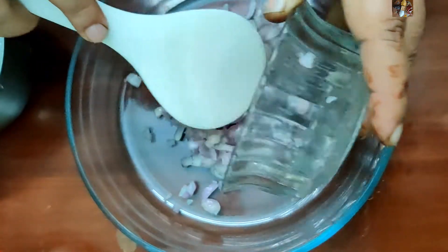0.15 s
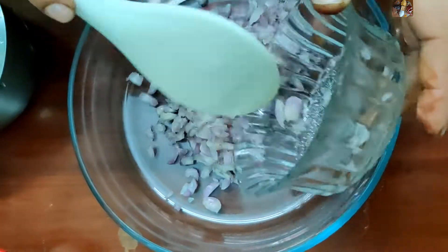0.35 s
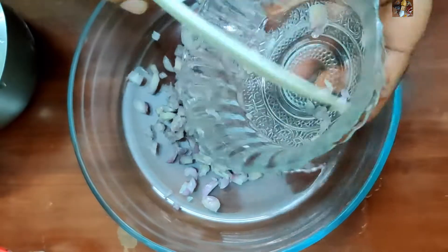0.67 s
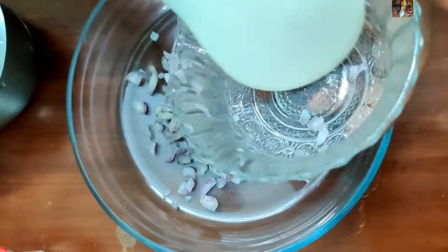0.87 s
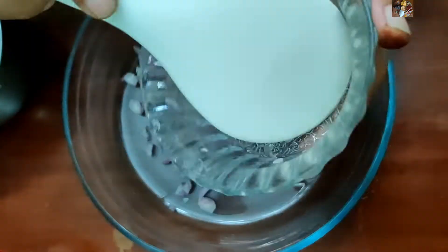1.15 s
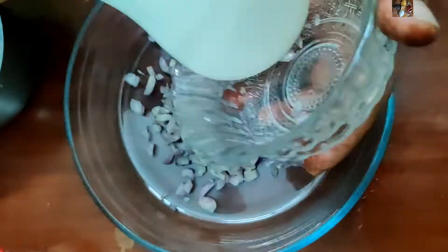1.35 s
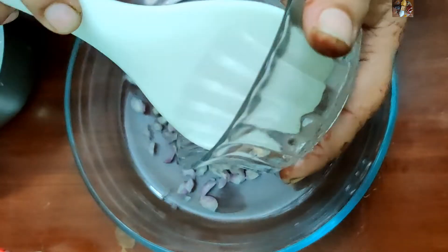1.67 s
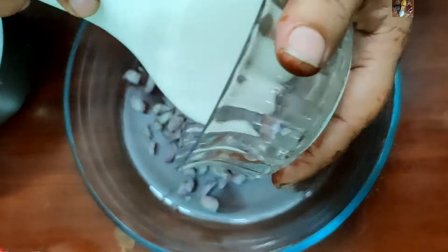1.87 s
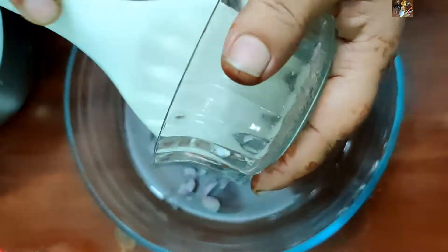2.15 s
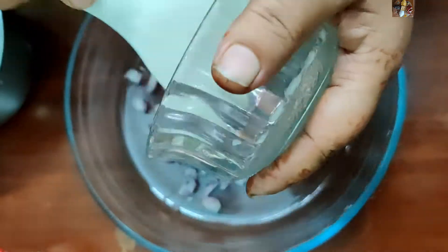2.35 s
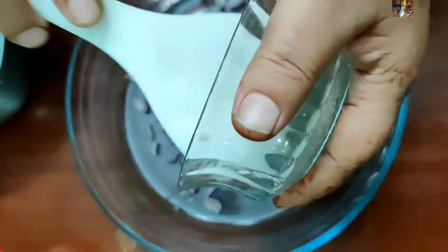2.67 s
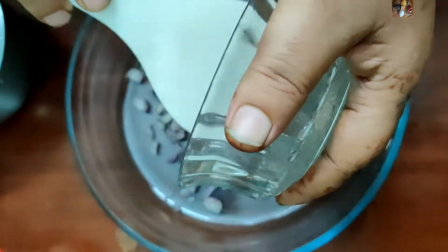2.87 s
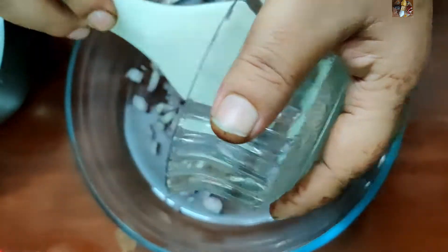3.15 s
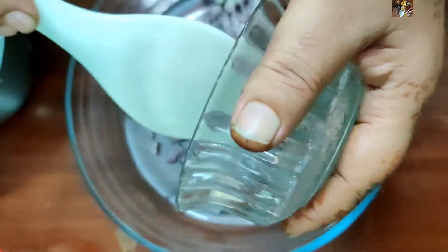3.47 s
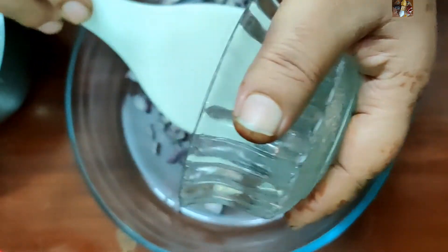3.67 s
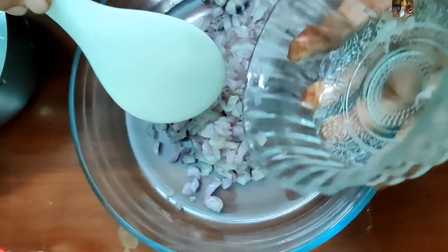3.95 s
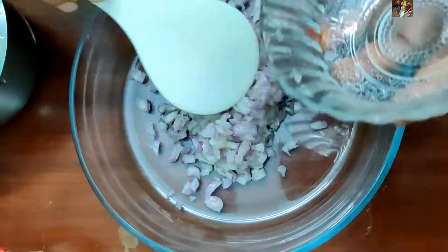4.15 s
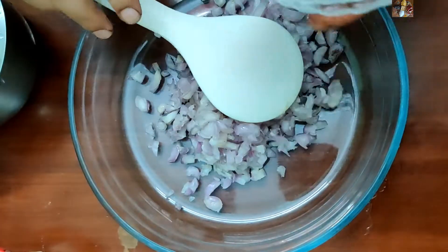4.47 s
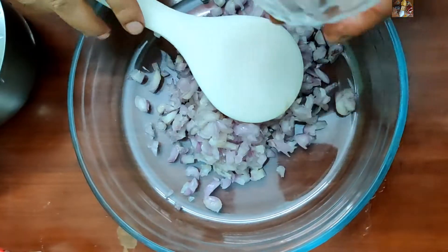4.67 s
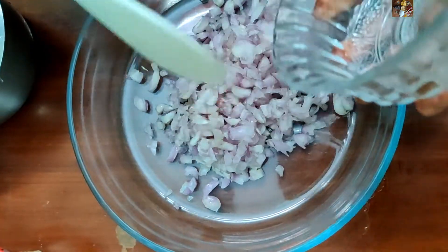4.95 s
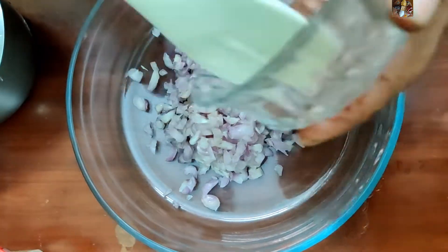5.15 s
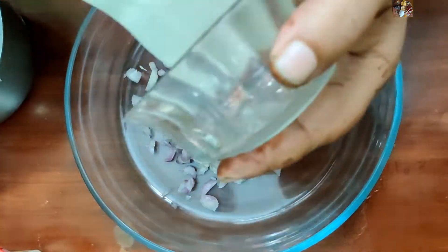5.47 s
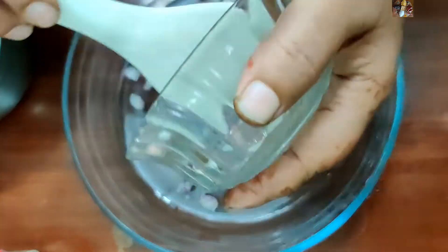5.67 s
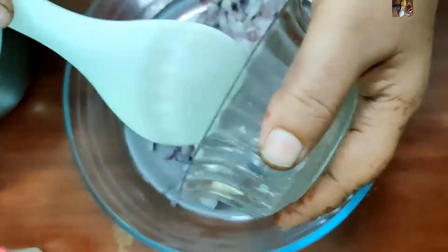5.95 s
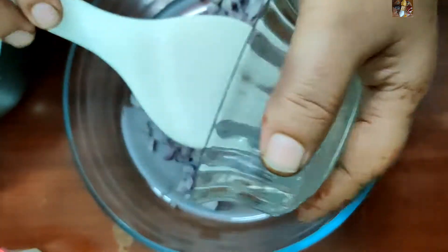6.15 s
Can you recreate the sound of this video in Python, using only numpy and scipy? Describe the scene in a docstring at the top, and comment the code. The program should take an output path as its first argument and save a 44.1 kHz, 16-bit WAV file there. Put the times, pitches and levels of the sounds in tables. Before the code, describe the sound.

Uneven bursts of plastic knocking on glass, some cushioned by moist onion, some bright and hard, with short gritty scrapes between. After a sparse start comes one very loud hollow clack, then busy tapping. A lull holds barely audible onion pats and a touch of the big bowl, which rebounds and rings with a slight waver. More firm taps follow. Close stereo phone pickup, lively kitchen reflections, low mains hum and quiet room air.

```python
"""A plastic spatula knocks chopped onion out of a small hand-held glass bowl into a big glass bowl, close to a phone.
Taps run throughout: dull knocks where onion cushions them, short clinks on bare glass; the blade scrapes between.
At 1.3 s it slaps down flat with a loud hollow clack; heavy blows also thump the table.
Near 4 s onion bits patter down, then at 4.5 s the big bowl is touched, rebounds and rings freely; taps resume at 5.3 s.
Impacts excite decaying modes and filtered noise; a hard-walled kitchen echoes over mains hum and room air."""
import sys
import numpy as np
from scipy import signal
from scipy.fft import rfft, irfft
from scipy.io import wavfile
from scipy.ndimage import uniform_filter1d, minimum_filter1d

SR = 44100
rng = np.random.default_rng(int(sys.argv[2]) if len(sys.argv) > 2 else 0)


def transcribe(u):
    """Save the signal u as a 16-bit wav file named by the first command-line argument.

    u: samples, shape (n,) or (channels, n), limited to [-1, 1]; the rate is SR.
    q: integer samples, one column per channel.
    """
    v = np.clip(np.atleast_2d(u).T, -1, 1)
    q = np.round(v * 32767).astype(np.int16)
    wavfile.write(sys.argv[1], SR, q)


N = 278252
TEN_MS = SR // 100  # samples

# modes of the hand-held bowl, 1 low ring, 4 high ring, rest top ring: (frequency [Hz], level [dB], t60 [s])
SMALL_BOWL_MODES = [(1808.6, 19.5, 0.07), (4583, 19.5, 0.081), (4550, 10.5, 0.1), (4680, 6.5, 0.061),
                    (4860, 2, 0.0453), (7880, -3.5, 0.073), (7980, 0.5, 0.055), (11330, -11.5, 0.035),
                    (12200, -12, .035)]
LOW_MODES, HIGH_MODES, TOP_MODES = SMALL_BOWL_MODES[:1], SMALL_BOWL_MODES[1:5], SMALL_BOWL_MODES[5:]
# spectrum of a click on glass: (frequency [Hz], level [dB])
CLICK_SPECTRUM = [(100, -15.5), (500, -2.5), (1000, 3), (3100, 6.5), (4050, -1.5), (4850, 13),
                  (5900, -15.5), (7000, -11), (8200, -11), (10000, -26.5), (12500, -27.5), (16000, -42.5)]
# right microphone port against the left, for the room: (frequency [Hz], level [dB])
RIGHT_ROOM_SPECTRUM = [(100, 5), (1300, -1), (3000, -1.5), (4200, -23), (4700, -11), (5300, -1.5),
                       (6200, 6), (8000, 2), (15000, -2.5)]


def undb(db):
    """Amplitude ratio of a level in dB."""
    return 10 ** (np.asarray(db) / 20)


def along(points, hz):
    """Read (frequency [Hz], value) points on a log-frequency axis."""
    point_hz, value = np.transpose(points)
    return np.interp(np.log(hz + 1), np.log(point_hz), value)


def response(points, tilt_db_per_octave=0, size=2048):
    """Minimum-phase impulse response of a spectrum, tilted above 3 kHz."""
    hz = np.arange(size // 2 + 1) * SR / size
    db = along(points, hz) + tilt_db_per_octave * np.log2(np.maximum(hz / 3000, 1))
    # folding the cepstrum onto positive time makes the response causal
    cepstrum = irfft(np.log(undb(db)))
    cepstrum[1:size // 2] *= 2
    cepstrum[size // 2 + 1:] = 0
    return irfft(np.exp(rfft(cepstrum)))


def colour(x, points):
    """Filter by a spectrum."""
    return signal.fftconvolve(x, response(points))[:len(x)]


def blow(x, db):
    """Scale a transient to the energy of 10 ms at this level."""
    return x * undb(db) * np.sqrt(TEN_MS / np.sum(x ** 2))


def add(track, s, x):
    """Mix x into the track at time s."""
    i = max(int(s * SR), 0)
    track[i:i + len(x)] += x[:max(len(track) - i, 0)]


def ring(modes, detune=0., scatter=0.):
    """Decaying modes; grip and point of contact shift their pitch and strength (as fractions)."""
    t = np.arange(int(SR * np.max(modes, axis=0)[2])) / SR
    out = 0
    for hz, db, t60_s in modes:
        pitch_shift, size_shift = rng.uniform(-1, 1, 2)
        decay = np.exp(-np.log(1000) * t / t60_s)
        wave = np.sin(2 * np.pi * hz * (1 + detune * pitch_shift) * t) * decay
        out = out + blow(wave, db) * (1 + scatter * size_shift)
    return out


def contact(shape, chatter, t60_s, rise_s=0.00022):
    """One impact plus fast-dying chatter of the touching surfaces (amplitude ratio), both through shape."""
    t = np.arange(SR // 20) / SR
    swell = (1 - np.exp(-t / rise_s)) * np.exp(-np.log(1000) * t / t60_s)
    push = blow(rng.standard_normal(len(t)) * swell, 0) * chatter / np.sqrt(TEN_MS)
    push[0] += 1
    return signal.fftconvolve(push, shape)


def small_bowl():
    """Taps knock on the hollow under the blade, click and clack on the glass and ring the damped bowl.
    Hard contact shifts the balance from knock to click and top modes; the rim favours the low ring, the wall the high.
    The grip of the hand sets how strongly the glass rings."""
    # taps: (time [s], force [dB], hardness [0 onion-cushioned..1 bare glass], place [0 low on wall..1 rim],
    # glass ring [dB], knock pitch [Hz])
    taps = [(0.0185, -41, 0.23, 1, -4, 1290), (0.6713, -26, 0.044, 0.37, 9.5, 1102),
            (0.6763, -27, 0.74, 0.24, -4, 940), (1.2427, -50, 0, 0.72, 13.5, 1190),
            (1.3985, -25.5, 0.2, 1, -4, 1330), (1.4554, -20, 0.76, 0.31, -0.5, 1320),
            (1.6989, -29, 0.56, 0.33, 8.5, 1180), (1.784, -24, 0.38, 0.87, -11, 1097),
            (2.188, -33, 0.7, 0.55, 1.5, 1196), (2.24, -30, 0.75, 0.17, -12, 2340),
            (2.464, -44.5, 0, 0.29, -10, 1150), (2.481, -30.5, 0.14, 0.14, -7.5, 1093),
            (2.62, -31.5, 0.62, 0.17, -5.5, 1120), (2.652, -35, 0.82, 0.38, 0, 1390),
            (2.667, -43, 0.74, .3, -6, 1500), (2.6965, -34.5, 0.6, 0.33, 0, 2220),
            (2.936, -39.5, 0.31, 0.38, -0.5, 1186), (3.133, -37, 0.55, 0.5, 3.5, 1234),
            (3.1665, -34.5, 0.64, 0.96, -2.5, 1270), (3.2377, -33.5, 0.18, 0.33, -7, 1185),
            (3.299, -20.5, 0.46, 0.42, 0.5, 1126), (3.6845, -28.5, 0.45, 0.5, 10.5, 1235),
            (3.7997, -28, 0.28, 0.58, 2, 1183), (3.825, -38, 0.47, 0.78, -1, 1150),
            (3.85, -33, 0.48, 0.73, 5, 1210), (5.275, -36.5, 0.81, 0.6, 3, 1190),
            (5.312, -29.5, 0.89, 0.98, -1, 1210), (5.5251, -25.5, 0.3, 0.46, 6, 1188),
            (5.7236, -37.5, 0.76, 0.68, -5, 2500), (5.8305, -18, 0.38, 0.4, -2, 1224),
            (5.838, -28, 0.13, 0.3, 2.5, 1240), (5.937, -35.5, 0.29, 0.56, -3, 1200),
            (6.1776, -26.5, 0.43, 0.73, 6, 1224), (6.2997, -29, 0.21, 0.82, 3.5, 1210)]
    # quickly damped wall modes: (frequency [Hz], level [dB], t60 [s])
    wall_modes = [(1420, 3, 0.0032), (2300, -5, 0.011), (3380, 2, 0.024)]
    # knock of the hollow between blade and wall: (multiple of knock pitch [1], level [dB])
    knock_spectrum = [(.1, -32.5), (.35, -20.5), (.62, -7.5), (1, 12.5), (1.24, -0.5), (1.6, -23),
                      (3.4, -26.5), (13, -69.5)]
    # how each part follows the contact: (level re force [dB], added at full hardness [dB], added at rim [dB])
    knock_law = (0.38, -25.5, 0)
    click_law = (-19.5, 18.6, 0)
    wall_law = (-26, 13, 0)
    low_ring_law = (-29, 12.7, 15.7)
    high_ring_law = (-6.5, 22.55, -27)
    top_ring_law = (-49, 37.1, 7.9)
    # a narrower hollow snaps higher and louder
    usual_hollow_hz, snap_db_per_octave = 1170, 8.5
    # harder contact is brighter
    soft_tilt_db_per_octave, hard_tilt_db_per_octave = -8, 11.5

    out = np.zeros(N)
    for s, force_db, hardness, place, glass_db, knock_hz in taps:
        hollow = response([(multiple * knock_hz, db) for multiple, db in knock_spectrum])
        knock = contact(hollow, chatter=0.19, t60_s=0.034)
        snap_db = snap_db_per_octave * np.log2(knock_hz / usual_hollow_hz)

        tilt = soft_tilt_db_per_octave + hard_tilt_db_per_octave * hardness
        click = contact(response(CLICK_SPECTRUM, tilt), chatter=14, t60_s=.032, rise_s=.0008)
        clack = ring(wall_modes, detune=.1, scatter=.6)

        low = ring(LOW_MODES, detune=.009)
        high = contact(ring(HIGH_MODES, detune=.007, scatter=.6), chatter=1.3, t60_s=0.025)
        top = ring(TOP_MODES, detune=.012, scatter=.6)

        parts = (
            (knock, knock_law, snap_db),
            (click, click_law, 0),
            (clack, wall_law, 0),
            (low, low_ring_law, glass_db),
            (high, high_ring_law, glass_db),
            (top, top_ring_law, 0),
        )
        for sound, (base_db, hard_db, rim_db), own_db in parts:
            level_db = force_db + base_db + hard_db * hardness + rim_db * place + own_db
            add(out, s, blow(sound, level_db))
    return out


def slap():
    """The blade lands flat in the bowl: one loud, hollow clack that leaves each side with its own rattle."""
    # hollow clack: (frequency [Hz], level [dB])
    slap_spectrum = [(200, -30), (680, -16), (1000, 4), (1300, 5.5), (1600, -7), (1830, 1.5), (2080, -6),
                     (2350, 2), (2900, -16), (4100, -18.5), (4750, -5.5), (5600, -30), (15000, -53)]
    slap_s, slap_db = 1.2986, -8.5
    out = np.zeros((2, N))
    for side in out:
        clack = contact(response(slap_spectrum), chatter=.45, t60_s=.015)
        add(side, slap_s, blow(clack, slap_db))
    return out


def big_bowl():
    """Glass meets glass: a click and a long ring whose close pair of modes beats, then a light rebound.
    Each mode radiates differently to left and right."""
    # free modes: (frequency [Hz], level [dB], t60 [s], right re left [dB])
    bowl_modes = [(747, -16, 0.45, -20.5), (1703, 1.5, 0.32, -2.5), (1681, -12.5, .3, -26),
                  (2720, -6, 0.41, 2), (3849, -12.5, 0.48, 9), (5130, -18, 0.37, 2), (6700, -35, 0.3, 8.5),
                  (8150, -31, 0.22, -21)]
    # touch and rebound: (time [s], ring level [dB], click level [dB])
    touches = [(4.5055, -27.5, -35), (4.527, -39, -37)]
    out = np.zeros((2, N))
    left = ring([(hz, db, t60_s) for hz, db, t60_s, _ in bowl_modes])
    right = ring([(hz, db + right_db, t60_s) for hz, db, t60_s, right_db in bowl_modes])
    for s, ring_db, click_db in touches:
        click = contact(response(CLICK_SPECTRUM, tilt_db_per_octave=-5), chatter=4.8, t60_s=0.032)
        click = blow(click, click_db)
        for side, tone in zip(out, (left, right)):
            add(side, s, tone * undb(ring_db))
            add(side, s, click)
    return out


def scraping():
    """The blade slips in uneven grains that rasp and make the glass shimmer; bare glass rasps brighter than onion."""
    # strokes: (start [s], end [s], rasp level [dB], glass ring level [dB], treble tilt [dB/octave])
    strokes = [(0.799, 1.069, -65, -66.5, 8), (0.918, 0.964, -58.5, -51, 7.5),
               (1.338, 1.452, -41.5, -61, -0.5), (1.858, 1.983, -55.5, -88, 0),
               (2.858, 2.954, -58.5, -66.5, 7.5), (3.72, 3.88, -54.5, -57, -10),
               (5.384, 5.438, -50, -60, 7.5), (5.866, 5.97, -52.5, -58, 4)]
    # rasp before tilt: (frequency [Hz], level [dB])
    rasp_spectrum = [(100, -20), (1000, 5.5), (1500, 5), (2350, 1.5), (4700, -12.5), (15000, -44)]
    slips_per_s, top_re_glass_db = 3000, -15
    # the stroke catches and lets go
    catches_per_s, catch_spread_db = 130, 5

    out = np.zeros(N)
    glass, top = ring(HIGH_MODES), ring(TOP_MODES)
    for start_s, end_s, rasp_db, glass_db, tilt in strokes:
        n = max(int((end_s - start_s) * SR), TEN_MS)
        slips = rng.random(n) < slips_per_s / SR
        grains = slips * rng.standard_normal(n) * undb(3 * rng.standard_normal(n))

        catches = rng.standard_normal(int(n / SR * catches_per_s) + 2)
        catch_position = np.arange(n) / SR * catches_per_s
        pressure_db = catch_spread_db * np.interp(catch_position, np.arange(len(catches)), catches)
        grains *= undb(pressure_db) * signal.windows.tukey(n, .5)

        bodies = (
            (response(rasp_spectrum, tilt), rasp_db),
            (glass, glass_db),
            (top, glass_db + top_re_glass_db),
        )
        for body, db in bodies:
            # level holds over the stroke's length, not 10 ms
            add(out, start_s, blow(signal.fftconvolve(grains, body), db) * np.sqrt(n / TEN_MS))
    return out


def table():
    """Heavy blows thump the wooden table: low-frequency impacts with brief chatter."""
    # blows that reach the table: (time [s], level [dB])
    thuds = [(1.456, -32.5), (1.6998, -39), (1.7826, -45.5), (3.297, -42)]
    # thump: (frequency [Hz], level [dB])
    thud_spectrum = [(40, -19.5), (130, -6.5), (230, 0), (350, 3.5), (480, -6.5), (700, -6.5), (1200, -26),
                     (5000, -52.5)]
    out = np.zeros(N)
    for s, db in thuds:
        add(out, s, blow(contact(response(thud_spectrum), chatter=0.92, t60_s=0.011), db))
    return out


def onion_bits():
    """Moist bits drop into the big bowl with a soft, dead pat: two very short modes with chatter."""
    # landings: (time [s], level [dB])
    landings = [(4.012, -60.5), (4.257, -60), (4.381, -60)]
    pat_modes = [(2920, -1.5, .015), (1650, -3.5, 0.007)]  # (frequency [Hz], level [dB], t60 [s])
    out = np.zeros(N)
    for s, db in landings:
        pat = contact(ring(pat_modes, detune=0.072), chatter=3.0, t60_s=0.054)
        add(out, s, blow(pat, db))
    return out


def echo_pattern(wet_db, build_s):
    """Bowl and table top answer at once; the hard walls follow with separate echoes that thicken into a wash."""
    # room decay: (frequency [Hz], t60 [s])
    room_t60 = [(150, 0.98), (1000, 0.6), (2500, 0.67), (5000, 0.54), (14000, 0.57)]
    # room colour: (frequency [Hz], level [dB])
    room_spectrum = [(100, -6), (500, 1), (1100, -1), (2600, -0.5), (4500, -1.5), (9000, -3.5),
                     (15000, 3.5)]
    near_db, near_decay_s, wall_delay_s = 9, 0.007, 0.023
    echo_spread_db = 9  # unevenness of the first echoes

    t = np.arange(SR) / SR
    spread_db = echo_spread_db * np.exp(-t / .15) * rng.standard_normal(SR)
    echoes = rng.standard_normal(SR) * undb(spread_db)
    echoes /= np.sqrt(uniform_filter1d(echoes ** 2, size=600))

    # each frequency decays at its own rate
    hz, frame_s, cells = signal.stft(echoes, SR, nperseg=256)
    cells = cells * np.exp(-np.log(1000) * frame_s / along(room_t60, hz)[:, None])

    near = undb(near_db) * (1 - np.exp(-t / build_s)) * np.exp(-t / near_decay_s)
    walls = np.clip(t / wall_delay_s, 0, 1) ** 2
    tail = signal.istft(cells, SR)[1][:SR] * (near + walls)
    return colour(undb(wet_db) * tail / np.sqrt(np.sum(tail ** 2)), room_spectrum)


def kitchen(x, wet_db, build_s):
    """The hands and the bowl keep moving, so each second has its own pattern of echoes."""
    out = np.zeros(N)
    for i in range(0, N, SR):
        add(out, i / SR, signal.fftconvolve(x[i:i + SR], echo_pattern(wet_db, build_s)))
    return out


def background(air_db=-64.0):
    """Wavering mains-hum sines and filtered-noise room air, whose bass is more alike on both sides."""
    # mains hum: (frequency [Hz], level [dB], waver [dB])
    hum_tones = [(48.4, -69.5, 1), (101, -65.5, 2), (149.8, -65.5, 0.5)]
    # room air: (frequency [Hz], level [dB])
    air_spectrum = [(25, -15.5), (69, -18), (86, -4), (152, -10.5), (305, -12.5), (349, -18.5),
                    (648, -20.5), (1950, -33.5), (5430, -43.5), (7100, -40.5), (15500, -46.5)]
    t = np.arange(N) / SR
    knots_s = np.linspace(0, t[-1], num=40)
    hum = 0
    for hz, db, waver_db in hum_tones:
        waver = np.interp(t, knots_s, rng.standard_normal(len(knots_s)))
        level = np.sqrt(2) * undb(db + waver_db * waver)  # RMS to peak
        hum = hum + level * np.sin(2 * np.pi * (hz * t + rng.random()))

    mid, side = (colour(rng.standard_normal(N), air_spectrum) for _ in range(2))
    side = colour(side, [(100, -9.5), (500, -6.5), (2000, 1.0)])  # (frequency [Hz], level [dB])
    air = np.array([mid + side, mid - side]) * undb(air_db) / np.std(mid)
    lean_db = 0.95  # left up, right down
    return (hum + air) * undb([[lean_db], [-lean_db]])


def turn_phase(x):
    """All-pass: the right port hears the bowl in opposite phase in one band."""
    centre_hz, width_hz = 1273, 200
    b, a = signal.iirpeak(centre_hz, centre_hz / width_hz, fs=SR)
    return x - 2 * signal.lfilter(b, a, x)


def scene():
    """The small bowl sits nearer the left port; the big bowl lies under both."""
    # right port against the left, for the near bowl: (frequency [Hz], level [dB])
    right_port_spectrum = [(100, -18.5), (700, -4), (1000, -2), (1400, -24), (1850, -11.5), (3000, -15.5),
                           (4000, -5.5), (4600, -22.5), (5300, -6), (6200, 5), (8100, -2), (15000, -8)]
    held = small_bowl() + table() + scraping()
    free_left, free_right = big_bowl() + onion_bits()
    clack_left, clack_right = slap()
    everything = held + free_left + clack_left
    left = everything + kitchen(everything, wet_db=-10.0, build_s=0.0022)

    # direct sound reaches the right port a few samples later
    right = np.roll(turn_phase(colour(held, right_port_spectrum)), shift=4)
    below = np.roll(free_right + turn_phase(clack_right), shift=3)
    right_echoes = kitchen(everything, wet_db=-9.5, build_s=0.0023)
    right += colour(below + right_echoes, RIGHT_ROOM_SPECTRUM)
    return np.array([left, right]) + background()


def limiter(x, ceiling, release_db_per_s):
    """The gain drops just ahead of a peak and creeps back."""
    peak = -minimum_filter1d(-np.abs(x).max(axis=0), size=88)
    over_db = 20 * np.log10(np.maximum(peak / ceiling, 1))
    recovery_db = release_db_per_s * np.arange(N) / SR
    cut_db = np.maximum.accumulate(over_db + recovery_db) - recovery_db
    return x * undb(-uniform_filter1d(cut_db, size=44))


def record(dry):
    """The phone limits peaks above a ceiling, then a steep low-pass cuts the top."""
    top_hz = 16000
    held_down = limiter(dry, ceiling=.88, release_db_per_s=45)
    low_pass = signal.ellip(8, .2, 70, top_hz, fs=SR, output="sos")
    return signal.sosfilt(low_pass, held_down)


dry = scene()
out = record(dry)
transcribe(out)
```